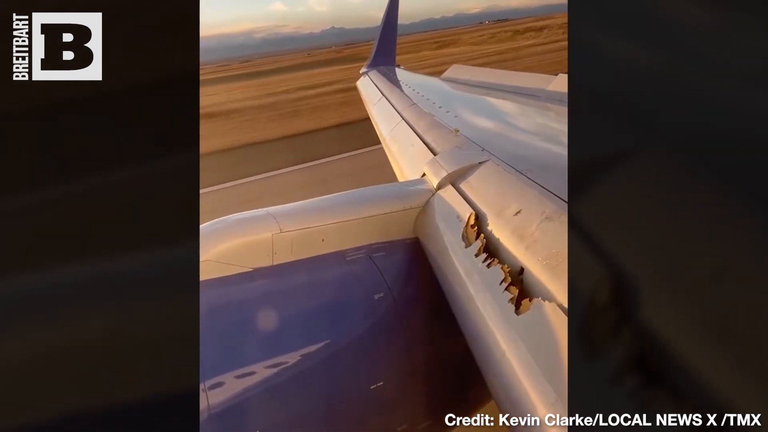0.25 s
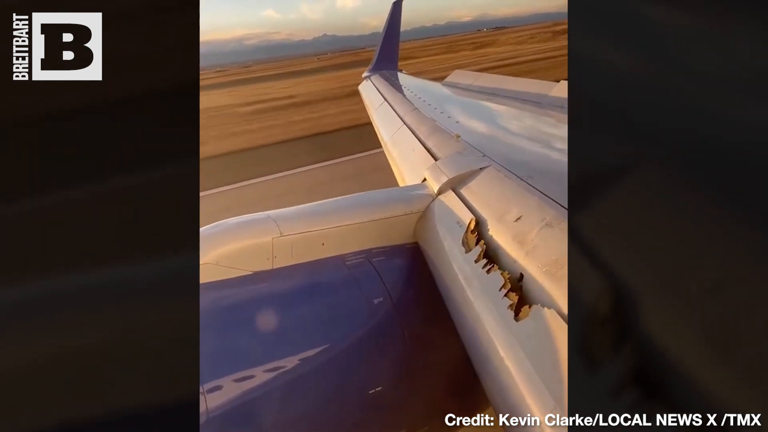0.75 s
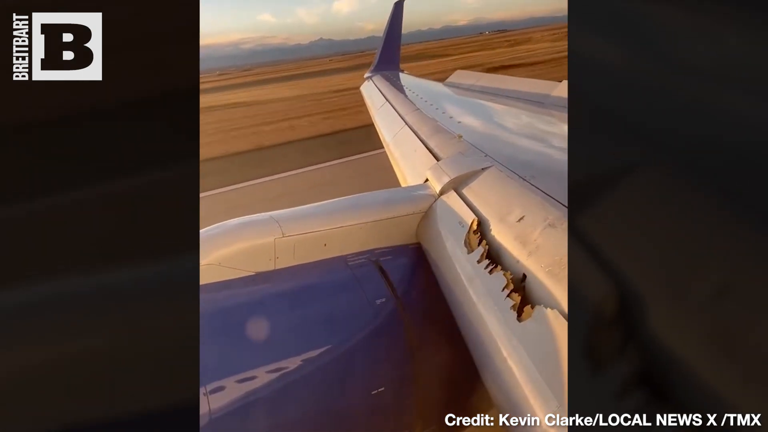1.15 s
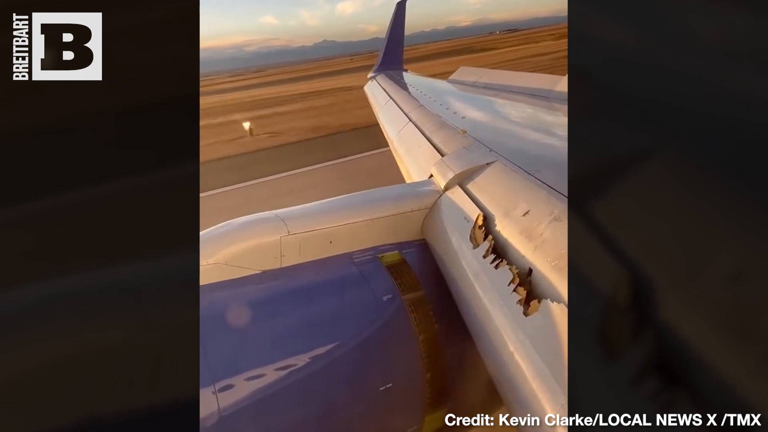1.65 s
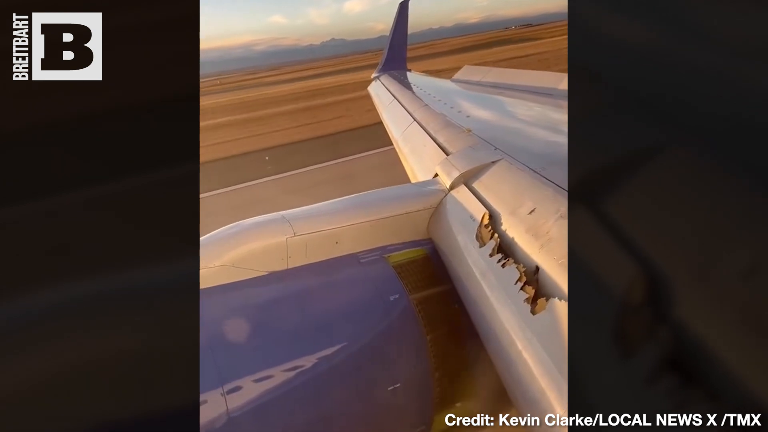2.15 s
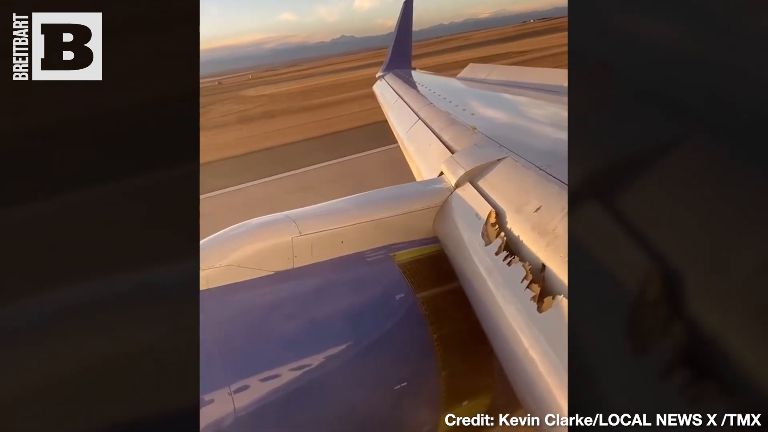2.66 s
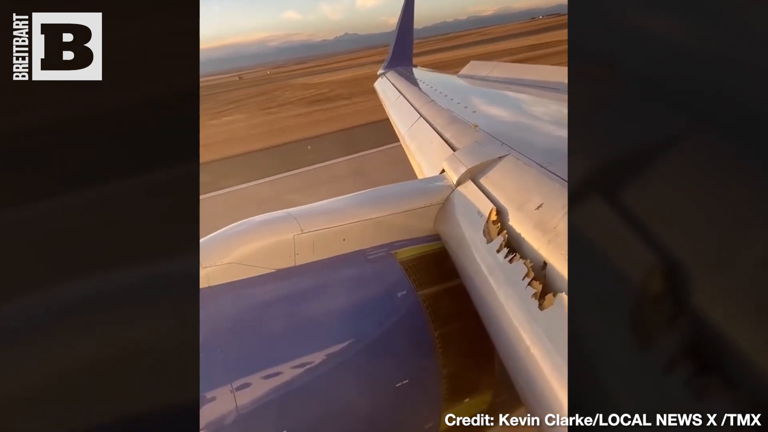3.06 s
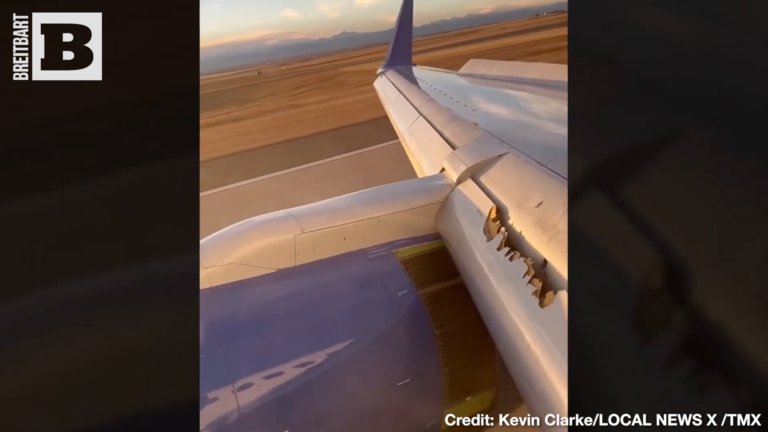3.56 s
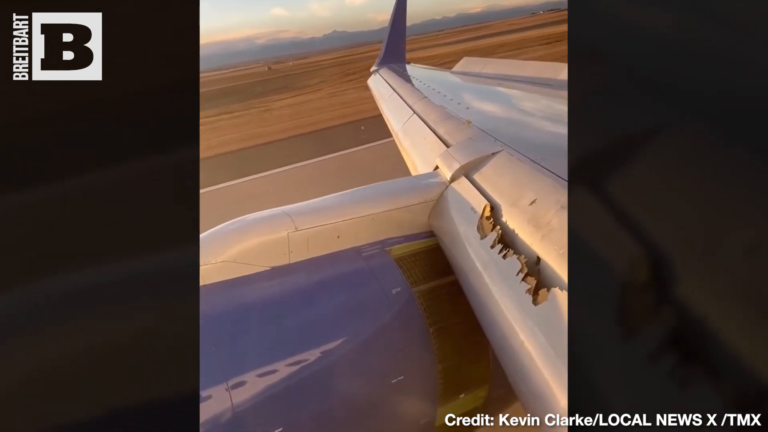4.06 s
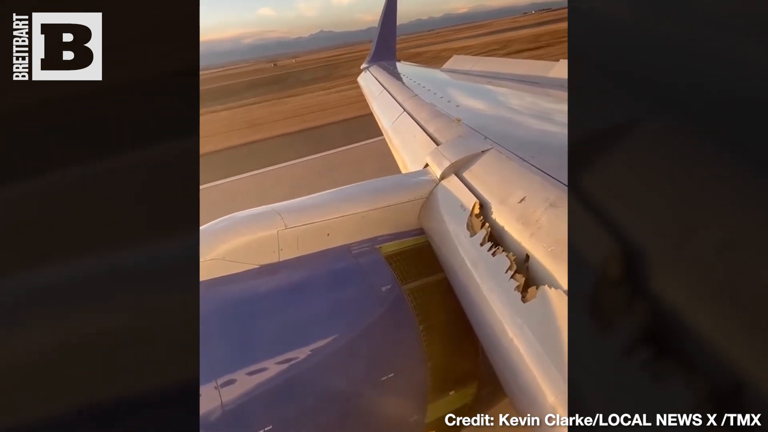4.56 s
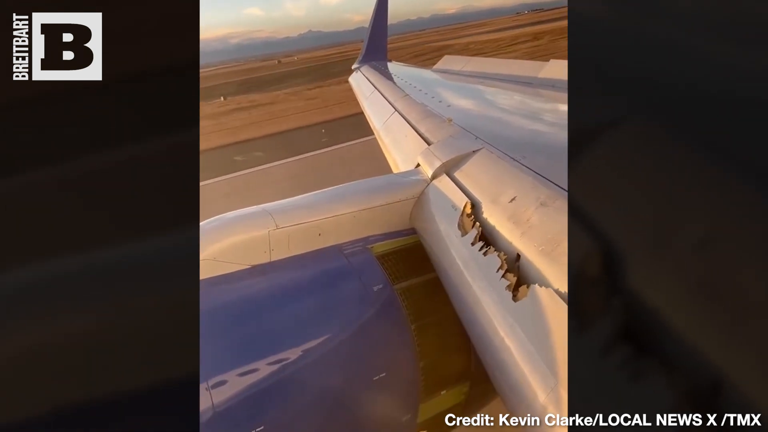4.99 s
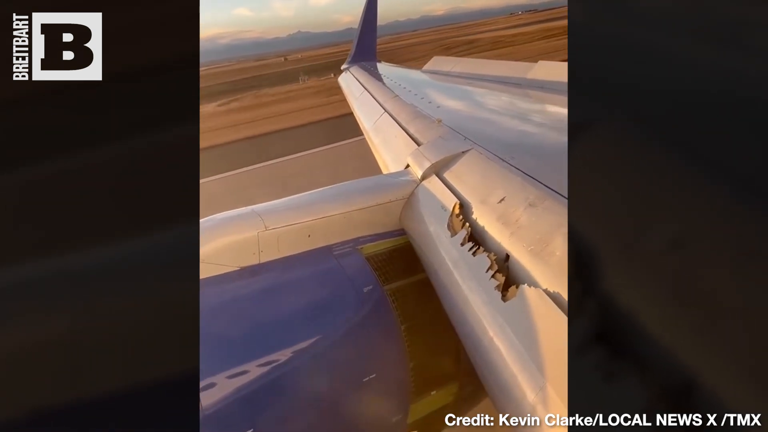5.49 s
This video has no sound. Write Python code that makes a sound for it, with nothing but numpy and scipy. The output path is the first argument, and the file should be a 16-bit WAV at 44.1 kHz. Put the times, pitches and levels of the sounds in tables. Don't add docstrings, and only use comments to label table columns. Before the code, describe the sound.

Heavy low cabin rumble of a slowing airliner, runway joints thumping softly, reverse thrust swelling midway, with one small latch snap.

```python
import sys
import numpy as np
from scipy import signal
from scipy.fft import rfft, irfft, dct, next_fast_len
from scipy.io import wavfile
from scipy.ndimage import uniform_filter1d, minimum_filter1d

SR = 44100
rng = np.random.default_rng(int(sys.argv[2]) if len(sys.argv) > 2 else 0)


def dump(signal):
    limited = np.clip(np.atleast_2d(signal).T, -1, 1)
    pcm = np.round(limited * 32767).astype(np.int16)
    wavfile.write(sys.argv[1], SR, pcm)


N = 252693

# t/s, level/dB added to the boom
JOINTS = [(.08, 3), (0.192, 4), (0.299, 3.5), (.47, 3.5), (.68, 8), (.91, 3.5), (1.07, 5.5), (1.261, 1.5),
          (1.38, 6), (1.581, 4), (1.99, 6.5), (2.56, 2), (2.83, -1), (3.249, 2.5), (3.37, 3.5), (3.611, 6),
          (3.75, -0.5), (4.22, 8), (4.93, 4), (5.24, 6), (5.55, 2), (5.72, 3.5)]


def heave_db():
    half_width_s = 0.026
    t = np.arange(0, N, 64) / SR
    bells = sum(db * np.exp(-((t - s) / half_width_s) ** 2 / 2) for s, db in JOINTS)
    return np.interp(np.arange(N) / SR, t, bells)


# f/Hz, level/dB (per Hz)
BOOM = [(15, -40), (26, -33), (33, -26), (42, -9.5), (48, -5), (55, -4.5), (59, -4.5), (63, -4.5), (68, -5),
        (76, -5.5), (88, -6), (100, -8), (125, -30), (200, -90)]


def fuselage():
    level = level_db(idle_db=-15, follow=-0.083, slowing_db=0) + heave_db()
    return gain_of(level) * turbulence(BOOM, calm=0.48, calm_s=0.029)


def tyres():
    t = np.arange(N) / SR
    drone_hz, sag_hz_per_s, level = 66.5, 1.3, -15
    beat_s, in_step_s = 2.15, 3.08
    turns = np.cumsum(drone_hz - sag_hz_per_s * t + 0.5 * drift(2.5)) / SR
    beat = np.cos(np.pi * (t - in_step_s) / beat_s)
    return np.sqrt(2) * gain_of(level) * beat * np.sin(2 * np.pi * turns)


# f/Hz, level/dB (per Hz)
RUMBLE = [(60, -59), (85, -23), (100, -0.5), (118, 1), (139, -1.5), (176, -3.5), (200, -7.5), (230, -40.5),
          (400, -89.5)]


def wheels():
    level = level_db(idle_db=-17.5, follow=0.6, slowing_db=0.11)
    return gain_of(level) * turbulence(RUMBLE, calm=0.23, calm_s=0.066)


# f/Hz, level/dB (per Hz)
ROAR = [(120, -71), (175, -30.5), (200, 1.5), (240, 1), (282, 1), (330, -1), (370, -9.5), (420, -25),
        (800, -92.5)]


def jets():
    level = level_db(idle_db=-22, follow=1.17, slowing_db=0)
    return gain_of(level) * turbulence(ROAR, calm=0.068, calm_s=0.015)


# f/Hz, level/dB (per Hz)
PANE = [(200, -77), (330, -20.5), (370, -3), (419, 0), (453, -2), (490, -5), (520, -2), (545, -4),
        (585, -14), (640, -27.5), (1200, -83.5)]


def window_pane():
    level = level_db(idle_db=-29.5, follow=0.3, slowing_db=-0.16)
    return gain_of(level) * turbulence(PANE, calm=0.041, calm_s=0.066)


# f/Hz, level/dB (per Hz)
RUSH = [(300, -69), (585, -18.5), (612, 3), (650, -3), (960, -8.5), (1100, -11), (1400, -6.5),
        (1591, -13.5), (1711, -16), (2125, -16.5), (2455, -19.5), (2700, -26), (3000, -38.5), (6000, -100)]


def wall_air():
    level = level_db(idle_db=-36, follow=0.22, slowing_db=-0.25) + 0.22 * drift(27.0)
    return gain_of(level) * ports(*rattle(1500.0, spread_db=1.5, share=0.3), RUSH)


# f/Hz, level/dB (per Hz)
FIZZ = [(1200, -67), (2400, -29.5), (2750, -0.5), (3500, 0), (4400, -3.5), (5400, -7), (6750, -12),
        (7300, -13), (8300, -12), (9700, -22), (10500, -20), (12000, -22.5), (14000, -27), (15500, -46)]


def trim_db():
    return level_db(idle_db=-52, follow=0.55, slowing_db=0.2)


def trim():
    level = trim_db() + 0.82 * drift(14.0)
    return gain_of(level) * ports(*rattle(2500.0, spread_db=2.5, share=0.64), FIZZ)


# t/s, peak level/dB, t60/s
SNAPS = [
    (2.543, -43, 0.05),
    (2.545, -29, 0.07),
    (2.557, -38.5, .05),
    (2.573, -46.5, .1),
]
# f/Hz, level/dB (per Hz)
SNAP = [(500, -28.5), (1000, 14.5), (2200, 8.5), (3500, 5.5), (4500, 2.5), (8000, -1.5), (9600, -10),
        (10500, 0), (13000, -3), (14200, -4), (15000, -44)]


def latch():
    t = np.arange(N) / SR
    shape = np.zeros(N)
    for s, db, t60 in SNAPS:
        rise = np.clip((t - s) / 0.0029, 0, 1)
        shape += gain_of(db - 60 * abs(t - s) / t60) * rise
    lean = gain_of([[0.7], [-0.7]])
    return shape * ports(*rng.standard_normal((2, N)), SNAP) * lean


# t/s, f/Hz, level/dB
HUM = [
    (0, 397.6, -36),
    (1.5, 392.5, -36.5),
    (3, 391.1, -35),
    (3.6, 394.7, -53),
    (5.73, 404, -42),
]


def hum():
    turns = np.cumsum(curve(HUM, order=1) + 2.62 * drift(6.0)) / SR
    level = curve(HUM, order=2) + 1.2 * drift(12.0)
    return np.sqrt(2) * np.sin(2 * np.pi * turns) * gain_of(level)


# t/s, level/dB over idle
THRUST = [(0, 0), (1.1, -1), (1.5, 1.5), (2, 2.5), (2.4, 3.5), (2.8, 4.5), (3.25, 2), (3.6, 2), (4.2, 1.5),
          (4.8, 1.5), (5.3, -2), (5.73, 1)]


def level_db(idle_db, follow, slowing_db):
    return idle_db + follow * curve(THRUST, order=1) + slowing_db * np.arange(N) / SR


def turbulence(colour, calm, calm_s):
    x = ports(*rng.standard_normal((2, N)), colour)
    span = round(calm_s * SR)
    power = uniform_filter1d(uniform_filter1d((x ** 2).mean(0), span), span)
    return evened(x / (power + 0.045) ** (calm / 2))


def rattle(per_s, spread_db, share):
    size = gain_of(spread_db * np.minimum(rng.exponential(1, (2, N)), 5))
    size = size * rng.choice([-1.0, 1.0], (2, N))
    ticks = evened(size * (rng.random((2, N)) < per_s / SR))
    share = np.clip(share, 0, 1)
    return share * ticks + np.sqrt(1 - share ** 2) * rng.standard_normal((2, N))


# f/Hz, likeness 0-1
SAME = [(50, .996), (120, .98), (280, .955), (358, .72), (453, .6), (531, .8), (600, .25), (960, .5),
        (1050, .25), (1520, .68), (1711, .2), (2125, .6), (2700, .3), (6000, .2)]
# f/Hz, phase/rad
LEAD = [(300, 0), (450, -.1), (488, -1.7), (531, -.3), (590, 2), (960, 1.9), (1100, 3.4), (1600, 3.5),
        (1750, 7.1), (2000, 6.3), (2640, 6.4), (2840, 9.4), (3800, 9.4), (4070, 12.6)]
# f/Hz, level/dB
LEAN = [(80, -0.4), (280, -0.4), (340, 2.5), (420, 0.5), (531, -3.5), (600, 2.5), (960, -1.5), (1480, -3.5),
        (1750, 2.5), (2300, 0.6), (5000, 2.5), (7000, -0.5)]


def ports(left, other, colour):
    size = next_fast_len(N, real=True)
    hz = np.fft.rfftfreq(size, 1 / SR)
    same = np.clip(read(SAME, hz), 0, 1)
    a, b = rfft(left, size), rfft(other, size)
    right = same * np.exp(-1j * read(LEAD, hz)) * a + np.sqrt(1 - same ** 2) * b
    lean = gain_of(read(LEAN, hz) / 2)
    pair = np.array([a * lean, right / lean]) * gain_of(read(colour, hz))
    return evened(irfft(pair, size)[:, :N])


def drift(hz):
    noise = rng.standard_normal(N + 2 * SR)
    lowpass = signal.butter(2, hz, fs=SR, output="sos")
    return evened(signal.sosfiltfilt(lowpass, noise)[SR:-SR])


def gain_of(db):
    return 10 ** (np.asarray(db) / 20)


def evened(x):
    return x / np.sqrt(np.mean(x ** 2) + 1e-20)


def read(points, hz):
    f, value = np.transpose(points)
    return np.interp(np.log(hz + 1), np.log(f + 1), value)


def curve(rows, order):
    return np.interp(np.arange(N) / SR, np.transpose(rows)[0], np.transpose(rows)[order])


def blotches(frames, lines_wide, frames_long):
    field = uniform_filter1d(rng.standard_normal((2, frames, 1024)), lines_wide, axis=2)
    return evened(uniform_filter1d(field, frames_long, axis=1))


# f/Hz, usual level/dB over one step
SUM_FINENESS = [(300, 26), (2200, 9), (2900, 4), (4300, 7.5), (5700, 4), (6800, -3), (7000, -12),
                (7800, -19), (7900, 0), (9000, -5), (10150, -11), (10700, -6), (13200, -11), (13500, -17)]
# f/Hz, usual level/dB over one step
DIFF_FINENESS = [(300, 24), (1500, 15), (2150, 2), (3000, 8), (4600, 2), (5600, 2), (6700, -4), (7000, 2),
                 (9200, -3), (9400, -15), (10250, -15), (10500, -3), (12000, -11), (14500, -18)]
# f/Hz, rarity in spreads of a random field
GAPS = [(700, 2.4), (1100, 1.6), (1350, 2), (1600, 1.15), (2200, 2), (3000, .7), (3300, 1.6), (3650, .7),
        (4200, 1.7), (6500, 1.2), (8200, 1.4), (14000, 1.1)]


def thinned(x, wander_db, streak_db):
    size, start = 1024, 2048 - 617
    window = signal.windows.kaiser_bessel_derived(2 * size, 4 * np.pi)
    frames = N // size + 4
    margins = (start, (frames + 1) * size - start - N)
    pair = np.pad([x[0] + x[1], x[0] - x[1]], ((0, 0), margins, ), "reflect")
    spots = np.arange(frames)[:, None] * size + np.arange(2 * size)
    a, b, c, d = np.split(pair[:, spots] * window, 4, axis=2)
    lines = dct(np.dstack([-c[..., ::-1] - d, a - b[..., ::-1]]), type=4, norm="ortho")
    usual = np.sqrt(uniform_filter1d(np.median(lines ** 2, axis=1), size=9) * 2.2)
    hz = np.arange(size) * SR / size / 2
    fineness_db = np.array([read(table, hz) for table in (SUM_FINENESS, DIFF_FINENESS)])
    missing = blotches(frames, 9, 4) > read(GAPS, hz)
    quiet = abs(lines) < 4 * usual[:, None]
    streaks = gain_of(-streak_db * blotches(frames, 4, 5) * (hz > 700))
    lines = lines * streaks * ~(missing & quiet)
    fizz_db = np.interp(np.arange(frames) * size - start, np.arange(N), trim_db())
    follow_db = 0.7 * (fizz_db - fizz_db.mean())[:, None] * (hz > 2700)
    wander = blotches(frames, 18, 3)
    step = (usual / gain_of(fineness_db))[:, None] * gain_of(wander_db * wander + follow_db) + 1e-12
    rounded = step * np.sign(lines) * np.floor(abs(lines) / step + 0.42)
    u, v = np.split(dct(rounded, type=4, norm="ortho"), 2, axis=2)
    heads = np.dstack([v, -v[..., ::-1]]) * window[:size]
    tails = np.dstack([-u[..., ::-1], -u]) * window[size:]
    pair = np.pad(heads, ((0, 0), (0, 1), (0, 0))) + np.pad(tails, ((0, 0), (1, 0), (0, 0)))
    total, gap = pair.reshape(2, -1)[:, start:start + N]
    return np.array([total + gap, total - gap]) / 2


def limited(x, ceiling):
    room_left = np.minimum(ceiling / (abs(x).max(0) + 1e-9), 1)
    held = minimum_filter1d(room_left, size=241)
    return x * uniform_filter1d(uniform_filter1d(held, size=121), size=121)


def scene():
    rolling = fuselage() + tyres() + wheels()
    engines = jets() + window_pane()
    inside = wall_air() + trim() + latch() + hum()
    return rolling + engines + inside


def band_limit(x):
    return signal.sosfilt(signal.butter(12, 14900, fs=SR, output="sos"), x)


def record(dry):
    mix = limited(thinned(dry, wander_db=3.5, streak_db=3.0), ceiling=0.795)
    return band_limit(mix)


dry = scene()
out = record(dry)
dump(out)
```